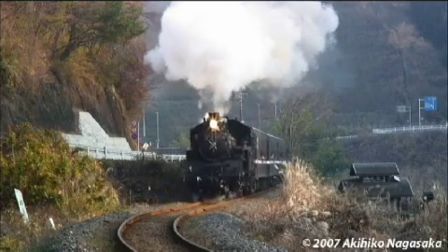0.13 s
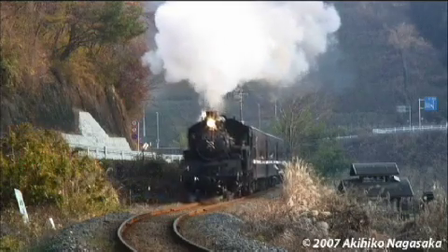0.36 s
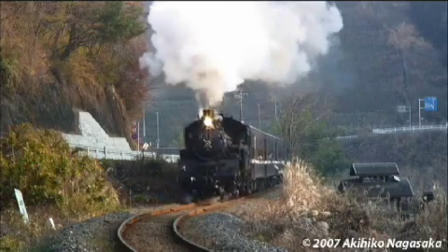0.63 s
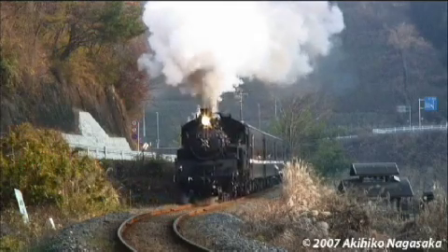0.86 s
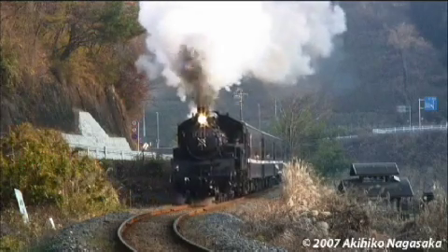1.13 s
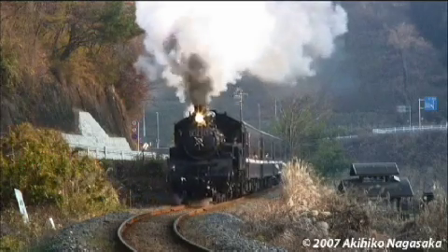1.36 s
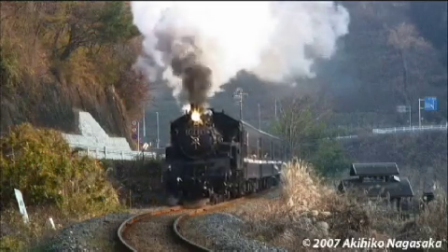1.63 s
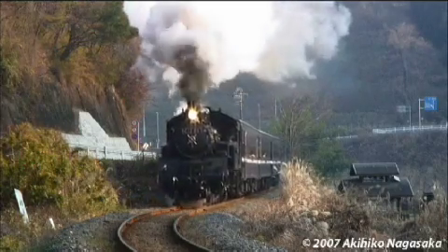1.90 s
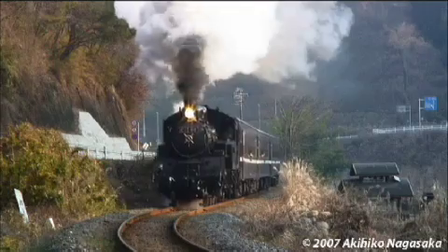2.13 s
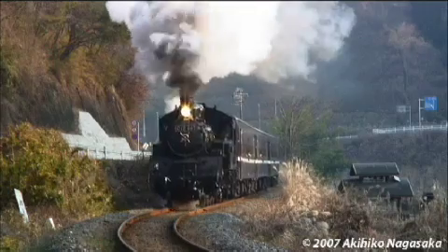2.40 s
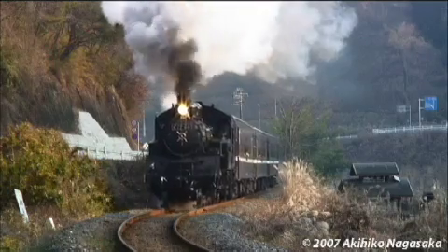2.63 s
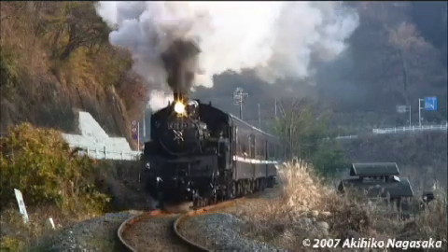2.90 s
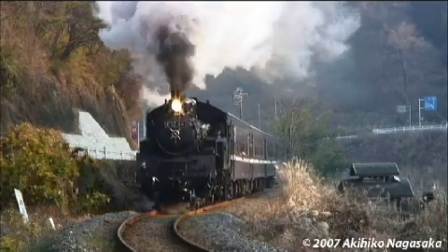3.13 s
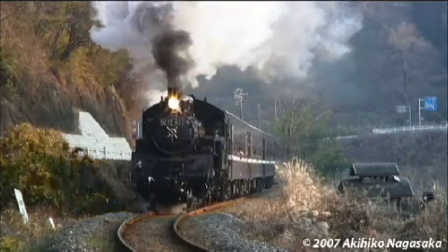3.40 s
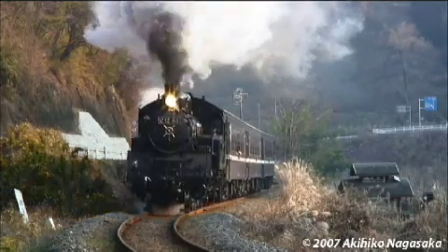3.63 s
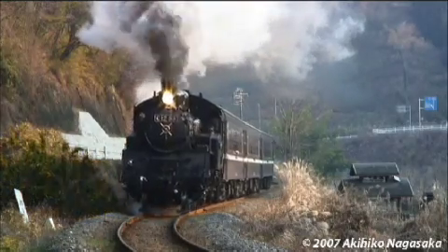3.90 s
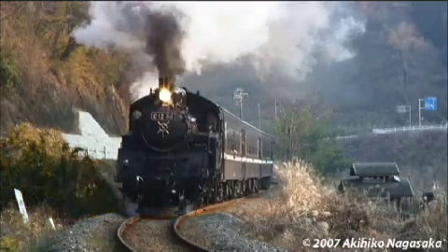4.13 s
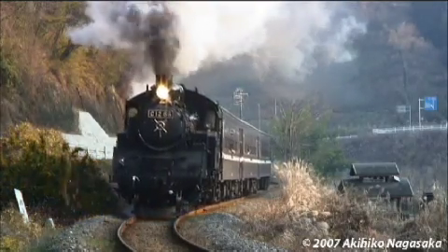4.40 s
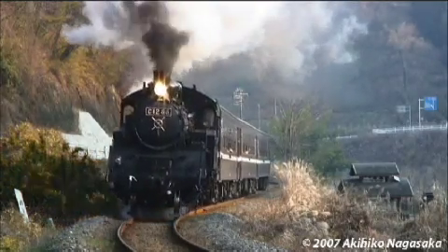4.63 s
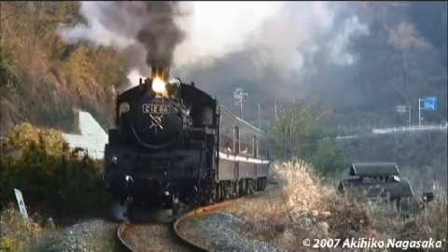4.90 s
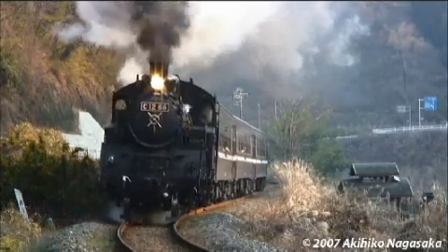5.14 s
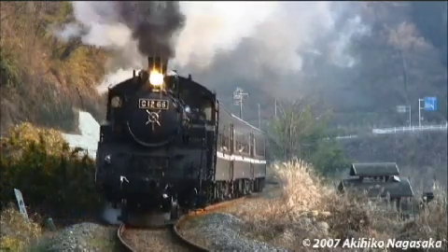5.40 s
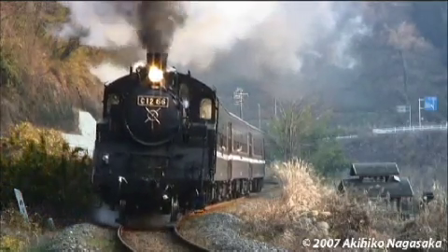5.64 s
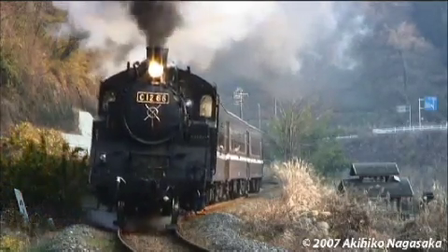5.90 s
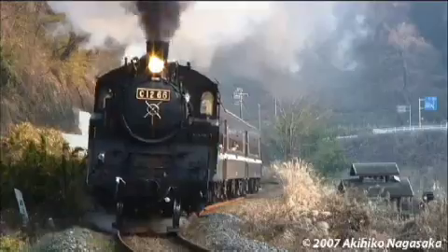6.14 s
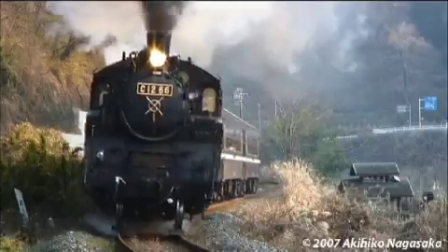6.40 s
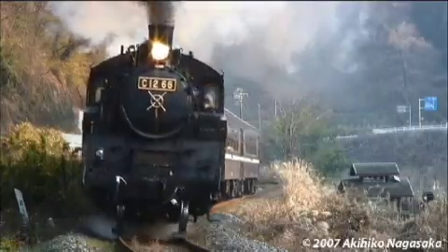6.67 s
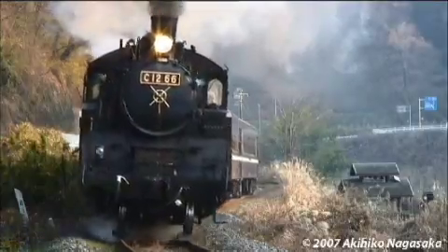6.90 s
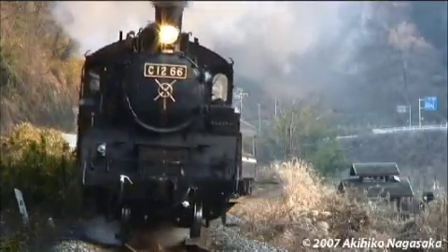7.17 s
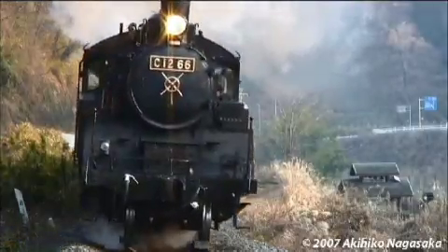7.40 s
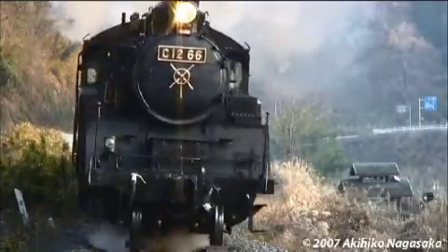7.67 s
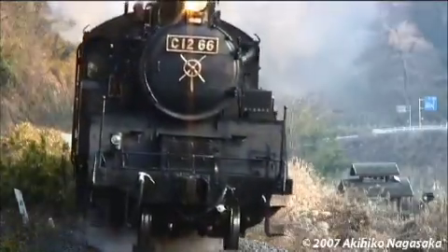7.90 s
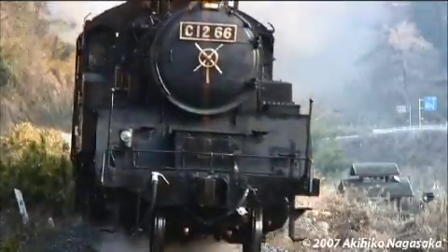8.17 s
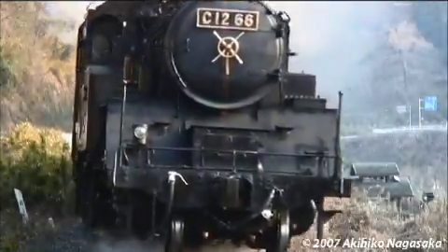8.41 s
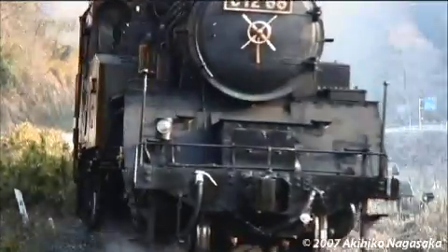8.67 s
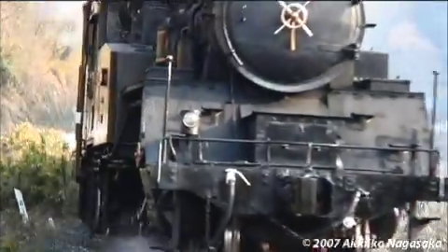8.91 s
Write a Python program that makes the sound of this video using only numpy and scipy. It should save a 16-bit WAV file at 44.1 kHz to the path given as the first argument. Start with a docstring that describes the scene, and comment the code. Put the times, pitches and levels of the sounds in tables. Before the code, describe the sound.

A steam locomotive climbs toward a lineside microphone for about nine seconds. From 0 s, faint hoarse chuffs emerge over a low rolling roar, the first couple of beats weakest, then settling at nearly eight per second. Each puff swells softly, barks in a hollow midrange, rasps and hisses, then drops quickly; rough little pops make every beat uneven. Faint metallic clanks ring near 1.3, 1.4, 1.8 and 2.9 s. From 3 to 5 s the chuffing grows gradually and quickens slightly. A short bark falls in pitch around 5.4 s. After 6 s the blasts become fuller and harder, with stronger wheel rumble and steam leak. A sharp burst and falling yelp stand out near 8.2 s. The last second is loudest and closest, ending mid-beat without fading. Diffuse echoes from the slope blur the gaps; the sound is mono, thin in bass and dull on top.

```python
"""Steam locomotive climbing past

A steam locomotive works uphill towards a lineside microphone; its exhaust beats quicken and grow.
Each beat is a puff of noise: a smokebox boom, a chimney bark, a throat rasp and a hiss at the lip.
Short rough tones are eddy bursts. A side rod clanks, wheels roar, steam leaks, and the cutting
answers with decaying noise. The microphone cuts bass and treble and adds a murmur of air."""
import sys
import numpy as np
from scipy import signal
from scipy.fft import rfft, irfft, next_fast_len
from scipy.io import wavfile
from scipy.ndimage import uniform_filter1d, map_coordinates

SR = 44100
rng = np.random.default_rng(int(sys.argv[2]) if len(sys.argv) > 2 else 0)


def store_wav(level_fs):
    """Save 16-bit WAV to argv[1]."""
    pcm = np.round(np.clip(np.atleast_2d(level_fs), -1, 1) * 32767)
    wavfile.write(sys.argv[1], SR, pcm.T.astype(np.int16))


def level_to_linear(level):
    """Convert decibel levels to linear amplitude factors, elementwise."""
    exponent = np.asarray(level, float) / 20
    return 10 ** exponent


N = 398663
TIME_S = np.arange(N) / SR

# exhaust beats: (time [s], boom [dB], bark [dB], rasp [dB], hiss [dB], nominal valve opening [ms])
EXHAUST_BEATS = [(0.01, -50, -47.5, -50.0, -62.5, 8.7), (0.106, -50.5, -52, -48, -62.5, 32.0),
                 (0.239, -53.5, -44.5, -44.5, -57, 62), (0.369, -52.5, -45, -44.5, -56, 42),
                 (0.505, -45.5, -40, -45, -54, 28.0), (0.63, -45, -43.5, -42, -57, 33),
                 (0.768, -47, -40.5, -44, -56, 47), (0.883, -47.5, -41.5, -42, -53.5, 40.0),
                 (1.013, -48, -42.5, -45.5, -55, 55), (1.142, -47, -45.5, -44.5, -54, 43),
                 (1.285, -40, -42.5, -45, -48.5, 18), (1.399, -45, -42.5, -42, -50.5, 38),
                 (1.532, -50, -41, -45.5, -51.0, 46.0), (1.658, -50.5, -44, -44.5, -53.5, 43),
                 (1.789, -40.5, -44, -43.5, -48.5, 26), (1.907, -45, -44.5, -45.5, -50.5, 41),
                 (2.034, -47, -39.5, -41.0, -51, 43), (2.161, -44, -40.5, -46.0, -52, 36),
                 (2.292, -44, -41, -43, -50.5, 46.0), (2.416, -41.0, -39.5, -41.5, -46.5, 20.0),
                 (2.539, -46.5, -39.5, -41.5, -51.5, 37), (2.664, -47.5, -41.5, -45, -49.5, 26),
                 (2.785, -41.5, -43, -47.5, -50.5, 38), (2.904, -42.5, -42, -41, -47.5, 26),
                 (3.027, -44, -38.5, -43.5, -52, 48.0), (3.151, -45, -42.5, -50, -49.5, 29.0),
                 (3.278, -47, -43, -42.5, -48.5, 40), (3.399, -44, -40, -41.5, -45.5, 17),
                 (3.529, -44, -37, -41, -45.5, 23), (3.643, -42, -36, -40, -49, 31),
                 (3.773, -43, -38.5, -38.5, -46.5, 27), (3.88, -41, -39.5, -40, -48, 38.0),
                 (4.011, -38.5, -38, -45, -47.5, 23), (4.121, -43, -40.5, -45.5, -49.5, 27),
                 (4.249, -49.5, -37, -42, -47.0, 22), (4.364, -37.5, -40, -42, -46.5, 14),
                 (4.486, -45.5, -39, -45.5, -47.5, 26), (4.603, -44, -40, -46.5, -48.5, 25),
                 (4.727, -40, -43.5, -41, -48.5, 34), (4.84, -41, -38, -39.5, -45.5, 33.0),
                 (4.965, -44, -42.5, -44.0, -48, 38), (5.079, -42, -36.5, -39.0, -45.5, 15),
                 (5.201, -43, -38, -39, -47, 41.0), (5.316, -38.0, -39, -39.5, -47, 36),
                 (5.442, -37, -34.5, -41, -44, 19), (5.551, -38, -37.5, -44.5, -46.0, 44.0),
                 (5.674, -39.5, -36.5, -37, -43.5, 41), (5.786, -51, -37.5, -37.5, -45.5, 31),
                 (5.904, -45, -35.5, -37.5, -49, 39), (6.02, -39, -33, -39, -46, 47),
                 (6.142, -40.5, -35.5, -35.5, -48, 53), (6.26, -40, -31, -37, -43.5, 31),
                 (6.374, -39, -36.0, -37.5, -47, 42), (6.491, -37.0, -34.5, -36.5, -44.5, 23.0),
                 (6.609, -37.5, -33, -34.5, -43.5, 57), (6.721, -35.5, -32.5, -34.5, -41.5, 30),
                 (6.842, -42, -32.5, -37.5, -45, 30), (6.954, -40, -36.0, -34.5, -44.0, 29),
                 (7.071, -33.5, -34, -33.5, -42, 38.0), (7.186, -36.0, -29, -33.5, -39.5, 23.0),
                 (7.3, -33.5, -33, -36.0, -43, 26), (7.414, -33, -35, -36, -41.5, 33),
                 (7.536, -35, -36, -33, -40.5, 33), (7.642, -30.5, -29.5, -35.0, -41.5, 31.0),
                 (7.76, -33.5, -29.0, -34.0, -41.5, 40), (7.875, -37.5, -31.5, -33.0, -41.5, 26.0),
                 (7.992, -32, -30.5, -31, -39, 41), (8.099, -32.5, -31.0, -30, -41, 31.0),
                 (8.207, -36.5, -28, -29, -40, 60.0), (8.328, -31.5, -28, -31.5, -42, 36),
                 (8.446, -31, -26.5, -26.5, -40.5, 47), (8.554, -31.5, -25.0, -28, -38.5, 26),
                 (8.67, -28.5, -24.5, -28, -40, 36), (8.778, -31.5, -28, -31.5, -40.5, 39.0),
                 (8.901, -29, -22, -29, -36.0, 28), (9.008, -29, -24.0, -30.5, -36.5, 21)]
# smokebox resonances: (frequency [Hz], bandwidth [Hz], relative level [dB])
SMOKEBOX_MODES = [(169.5, 33.8, -4), (210.2, 54.2, 2.5), (227.2, 77, -5)]
# chimney resonances: (frequency [Hz], bandwidth [Hz], relative level [dB])
CHIMNEY_MODES = [(279.6, 64, -7.5), (345, 44, 2.5), (459, 52, -3.5)]
# chimney-throat resonances: (frequency [Hz], bandwidth [Hz], relative level [dB])
THROAT_MODES = [(551, 55, -4), (737, 226, -8.5), (886, 236, -10), (1404, 32, -18.5), (1600, 100, -21.5)]
# jet noise at the chimney lip: (frequency [Hz], relative density [dB/Hz])
JET_SPECTRUM = [(600, -5), (1200, -1), (2000, -9.5), (3000, -6.5), (4200, -8.5), (5500, -15.5),
                (6500, -22.5), (7700, -44.5)]
# loudest eddy bursts in the chimney: (centre time [s], peak level [dB], pitch [Hz], nominal length [ms])
LOUD_POPS = [(0.125, -40, 461, 11), (0.38, -35.5, 328, 6.1), (0.522, -32, 487.3, 3.9),
             (0.641, -45, 530, 5.7), (1.029, -31.5, 478.5, 8.3), (1.169, -31, 345, 5.4),
             (1.295, -31, 467, 2.2), (1.321, -32.5, 349, 10.4), (1.404, -31.5, 397.6, 5.3),
             (1.661, -37.5, 517, 4.8), (1.912, -33.5, 345, 11), (2.418, -33.5, 465, 11),
             (2.684, -37.5, 431, 11), (3.031, -37, 525, 6), (3.163, -32, 378.6, 8),
             (3.537, -32.5, 479, 5.8), (3.642, -35, 477, 4.5), (3.773, -29.5, 473, 18),
             (3.884, -33.5, 482, 7.7), (4.251, -31, 438, 8.7), (4.372, -29, 397.3, 9.3),
             (4.501, -32.5, 413, 4), (4.606, -35, 421, 17), (4.628, -36.5, 393, 9), (4.73, -35, 345, 16),
             (4.976, -27.5, 375, 4.9), (5.317, -36, 481, 7), (5.563, -23, 384, 2.8),
             (5.681, -24.5, 371.5, 7.8), (5.796, -25, 367.7, 12), (5.908, -30.5, 397, 6),
             (5.937, -28.5, 368.4, 13), (6.268, -24, 371, 3), (6.61, -28, 421, 6.4),
             (6.724, -30.5, 496, 4.2), (7.074, -31, 474, 7.6), (7.182, -26.5, 421, 9.5),
             (7.331, -27, 383, 6.9), (7.426, -30, 376, 2.6), (7.537, -26.5, 438, 16),
             (7.779, -21.5, 441, 6.3), (7.998, -25, 454, 3.6), (8.088, -24, 516, 9), (8.209, -13, 585, 3),
             (8.339, -24.5, 440, 16), (8.449, -20.5, 423, 2.8), (8.558, -18.5, 402, 5.2),
             (8.679, -23.5, 447, 2.3), (8.79, -20, 398, 14), (8.902, -23, 427.4, 14),
             (9.014, -15, 419.5, 3.1)]
# barks of falling pitch: (time [s], main tone peak [dB], start [Hz], end [Hz], t60 [s], rise constant [s])
FALLING_BARKS = [(5.4135, -30, 880, 560, 0.2, .0018), (8.192, -16.5, 960, 520, 0.036, .03)]
# side-rod clanks: (time [s], pitch [Hz], level before decay [dB])
ROD_CLANKS = [(1.28, 1695, -52), (1.403, 1630, -47), (1.786, 1620, -44), (2.899, 1600, -37.5)]
# running noise: (time [s], mean steam leak level [dB], mean wheel roar level [dB])
TRAIN_LEVELS = [(0, -57, -50), (0.5, -59, -52), (2, -58, -49.5), (4, -57.5, -49), (6, -54.5, -46),
                (7.5, -55.5, -41.5), (8.4, -50, -37.5), (9.04, -46.5, -37)]
# wheel roar: (frequency [Hz], relative density [dB/Hz])
ROAR_SPECTRUM = [(53, -63), (90, -33), (178, 4.5), (259, -11), (347, 2), (491, -4), (572, -1),
                 (1200, -14.5), (1600, -23.5), (1890, -26), (2500, -40), (3250, -68.5), (5500, -120)]
# steam leak: (frequency [Hz], relative density [dB/Hz])
LEAK_SPECTRUM = [(590, -15), (1000, -8.5), (1620, -10), (2130, -18), (2910, -16), (5080, -22.5),
                 (6390, -27.5), (7320, -41), (7570, -60), (9840, -121), (16700, -120)]
# echo of the cutting: (frequency [Hz], t60 [s])
CUTTING_DECAY = [(150, 0.15), (1000, 0.16), (6000, 1)]
# colour by ground echo and air when near: (frequency [Hz], gain at nearness 1 against far [dB])
NEAR_COLOUR = [(120, 0.2), (200, -.4), (265, 4.87), (330, 1.39), (480, -.3), (800, 0.9), (1300, -3),
               (1900, -1.5), (3500, 0.1), (6500, 0)]
# approach of the engine: (time [s], nearness [0-1])
APPROACH_PATH = [(0, 0.026), (4.5, 0.12), (7, 0.21), (9.04, 1)]
# air on the capsule: (frequency [Hz], relative density [dB/Hz])
AIR_SPECTRUM = [(10, -4.5), (22, -2.5), (35, -8), (70, -15.5), (150, -19), (400, -42)]
# dull capsule: (frequency [Hz], gain [dB])
CAPSULE_TREBLE = [(6000, 0.0), (6700, -2.5), (6950, -4), (7700, -36.0)]


def exhaust(burst_rows):
    """One steam puff per beat drives four noise voices; eddies roughen bark, rasp and hiss."""
    beat_s, boom_db, bark_db, rasp_db, hiss_db, open_ms = np.transpose(EXHAUST_BEATS)
    hold_s = open_ms / 1000
    fall_s = (12.3 - 0.11 * open_ms) / 1000  # the longer the valve was open, the less steam is left
    lumps = wobble(90)
    fine_lumps_db = 0.75 * lumps + 0.79 * wobble(400)

    boom = filtered(eddies(patchy_db=4.0), resonances(SMOKEBOX_MODES))
    bark = level_to_linear(1.1 * lumps) * filtered(eddies(patchy_db=0.3), resonances(CHIMNEY_MODES))
    rasp = level_to_linear(1.3 * lumps) * filtered(eddies(patchy_db=1.66), resonances(THROAT_MODES))
    hiss = level_to_linear(fine_lumps_db) * coloured(JET_SPECTRUM, patchy_db=2.5)

    # boom, bark and rasp lag the hiss by 2-5 ms
    boom_flow = puffs(beat_s + 0.0022, boom_db, 1.02 * hold_s, 0.98 * fall_s, rise_s=0.011, sag_db_per_s=-61.5)
    bark_flow = puffs(beat_s + 0.0054, bark_db, 0.97 * hold_s, fall_s, rise_s=0.016, sag_db_per_s=-94.5)
    rasp_flow = puffs(beat_s + 0.003, rasp_db, 0.7 * hold_s, 1.2 * fall_s, rise_s=0.013, sag_db_per_s=-73.5)
    hiss_flow = puffs(beat_s, hiss_db, hold_s, 0.92 * fall_s, rise_s=0.018, sag_db_per_s=-63.5)
    return (steady(boom, 0.043) * boom_flow
            + steady(bark, 0.032) * bark_flow
            + steady(rasp, 0.023) * rasp_flow
            + steady(hiss, 0.022) * spits(burst_rows) * hiss_flow)


def puffs(start_s, level_db, open_s, fall_s, rise_s, sag_db_per_s):
    """Steam flow: bell-shaped rise, sagging hold, exponential fall of energy; puffs add in power."""
    power = np.zeros(N + SR)
    t = np.arange(-SR // 10, SR // 4) / SR
    for s, db, hold, fall in zip(start_s, level_db, open_s, fall_s):
        rise = np.exp(-(np.minimum(t, 0) / rise_s) ** 2)
        sag = level_to_linear(sag_db_per_s * np.clip(t, 0, hold))
        decay = np.exp(-np.maximum(t - hold, 0) / (2 * fall))
        power[round(s * SR):][:len(t)] += (level_to_linear(db) * rise * sag * decay) ** 2
    return np.sqrt(power[SR // 10:][:N])


def spits(burst_rows):
    """Each eddy burst also sharpens the jet: a bell of extra gain, a little longer than the burst."""
    gain = np.ones(N + SR)
    t = np.arange(SR // 10) / SR
    centre_s = t.mean()
    for s, _, _, length_ms in burst_rows:
        half_width_ms = 6 + 1.2 * length_ms
        bell = np.exp(-(1000 * (t - centre_s) / half_width_ms) ** 2)
        gain[round(s * SR):][:len(t)] += 0.25 * bell
    return gain[round(centre_s * SR):][:N]


def bursts():
    """Rows of the loud eddy bursts, plus a milder random one early in every beat that has none."""
    beat_s, _, bark_db = np.transpose(EXHAUST_BEATS)[:3]
    delay_s = 0.011
    luck = rng.standard_normal((4, len(beat_s)))
    gap_s = np.abs(beat_s[:, None] + delay_s - np.transpose(LOUD_POPS)[0]).min(axis=1)
    time_s = beat_s + delay_s * np.exp(0.4 * luck[0])
    peak_db = bark_db - 1.5 + 2.3 * luck[1]
    pitch_hz = 440 + 45.1 * luck[2]
    length_ms = 16 * np.exp(0.58 * luck[3])
    mild = np.transpose([time_s, peak_db, pitch_hz, length_ms])
    return np.vstack([LOUD_POPS, mild[gap_s > 0.04]])


def pops(burst_rows):
    """An eddy burst in the chimney is a few rough cycles under a bell."""
    out = np.zeros(N + SR)
    t = np.arange(SR // 10) / SR
    centre_s = t.mean()
    for s, db, hz, length_ms in burst_rows[burst_rows[:, 0] > centre_s]:
        bell = np.exp(-(1180 * (t - centre_s) / max(length_ms, 3)) ** 2)
        out[round((s - centre_s) * SR):][:len(t)] += level_to_linear(db) * bell * rough_tone(np.full(len(t), hz))
    return out[:N]


def yelps():
    """A falling bark is a cluster of four rough tones that slide down together."""
    out = np.zeros(N + SR)
    t = np.arange(SR // 10) / SR
    for s, db, start_hz, end_hz, t60_s, rise_s in FALLING_BARKS:
        pitch_hz = end_hz + (start_hz - end_hz) * np.exp(-t / 0.0229)
        shape = level_to_linear(-60 * t / t60_s) * (1 - np.exp(-t / rise_s)) ** 3
        cluster = sum(gain * rough_tone(ratio * pitch_hz)
                      for ratio, gain in ((1, 1), (0.74, 0.54), (1.2, 0.28), (0.55, 0.37)))
        out[round(s * SR):][:len(t)] += level_to_linear(db) * shape / shape.max() * cluster
    return out[:N]


def rough_tone(pitch_hz):
    """A sine on a pitch curve, its pitch shaken by turbulence."""
    shake = rng.standard_normal(len(pitch_hz))
    shake = uniform_filter1d(uniform_filter1d(shake, size=24), size=24)
    phase = np.cumsum(2 * np.pi * pitch_hz / SR + 0.09 * shake)
    return np.sin(phase + rng.uniform(0, 2 * np.pi))


def rods():
    """A loose side rod rings briefly: decaying sines with a soft onset."""
    out = np.zeros(N)
    for s, hz, db in ROD_CLANKS:
        age_s = np.maximum(TIME_S - s, 0)
        onset = 1 - np.exp(-age_s / 0.004)
        out += level_to_linear(db - 60 * age_s / 0.11) * onset * np.sin(2 * np.pi * hz * age_s)
    return out


def train():
    """Wheels roar on the rails and steam leaks from the glands: coloured noise of wavering level."""
    s, leak_db, roar_db = np.transpose(TRAIN_LEVELS)
    roar_swing_db = 1.5 * wobble(12) + 1.1 * wobble(2.99)
    roar = level_to_linear(np.interp(TIME_S, s, roar_db) + roar_swing_db) * coloured(ROAR_SPECTRUM, patchy_db=2.5)
    flutter_db = 1.2 * wobble(7)
    leak = level_to_linear(np.interp(TIME_S, s, leak_db) + flutter_db) * coloured(LEAK_SPECTRUM, patchy_db=-1.2)
    return roar + leak


def cutting(x):
    """The slope answers late with a noise tail; each frequency dies at its own speed."""
    hz, t, z = signal.stft(rng.standard_normal(SR // 2), SR, nperseg=256)
    decay = level_to_linear(-60 * t / along(CUTTING_DECAY, hz)[:, None])
    tail = signal.istft(z * decay, SR, nperseg=256)[1]
    delayed = np.pad(x, (800, 0))  # samples
    return signal.fftconvolve(delayed, tail / np.linalg.norm(tail))[:N]


def capsule_air():
    """Air murmurs on the capsule: low noise of swinging level."""
    return level_to_linear(-67.5 + 2.5 * wobble(4)) * coloured(AIR_SPECTRUM, patchy_db=-3.0)


def unit(x):
    """Scale to rms 1."""
    return x / np.sqrt(np.mean(x ** 2) + 1e-20)


def steady(x, seconds):
    """Even out random swells slower than the given time; rms 1."""
    power = np.abs(uniform_filter1d(x ** 2, size=max(round(seconds * SR), 9)))
    return unit(x / np.sqrt(power + 0.03 * np.mean(x ** 2)))


def along(points, hz):
    """Read (frequency [Hz], value) points on a log frequency axis."""
    f, v = np.transpose(points)
    return np.interp(np.log(hz + 1), np.log(f + 1), v)


def filtered(x, response):
    """Apply a complex response of frequency."""
    m = next_fast_len(N + SR // 2)
    return irfft(rfft(x, m) * response(np.fft.rfftfreq(m, 1 / SR)), m)[:N]


def resonances(modes):
    """Causal response of parallel resonances with alternating signs."""
    def response(f):
        total = 0
        for k, (centre_hz, width_hz, db) in enumerate(modes):
            damping = 1j * f * width_hz
            total = total + (-1) ** k * level_to_linear(db) * damping / (centre_hz ** 2 - f * f + damping)
        return total
    return response


def wobble(knots_per_s):
    """Smooth random curve through normal-distributed knots."""
    knots = rng.standard_normal(int(N * knots_per_s / SR) + 4)
    return map_coordinates(knots, [TIME_S * knots_per_s])


def eddies(patchy_db):
    """White noise with patches of random gain, some 250 Hz by 40 ms."""
    z = signal.stft(rng.standard_normal(N), nperseg=512)[2]
    field = uniform_filter1d(rng.standard_normal(z.shape), size=3, axis=0)
    field = uniform_filter1d(field, size=7, axis=1)
    return signal.istft(z * level_to_linear(patchy_db * unit(field)), nperseg=512)[1][:N]


def coloured(spectrum, patchy_db):
    """Patchy noise of rms 1 with the given spectrum."""
    return unit(filtered(eddies(patchy_db), lambda hz: level_to_linear(along(spectrum, hz))))


def scene():
    """Engine, its echo and the running train, changing colour on the way in."""
    burst_rows = bursts()
    engine = exhaust(burst_rows) + pops(burst_rows) + yelps() + rods()
    far = engine + level_to_linear(-8) * cutting(engine) + train()
    near = filtered(far, lambda hz: level_to_linear(along(NEAR_COLOUR, hz)))
    nearness = np.interp(TIME_S, *np.transpose(APPROACH_PATH))
    return (far + nearness * (near - far))[None]


def low_pass(x):
    """Removes everything above the highest recorded frequency."""
    return signal.sosfilt(signal.butter(12, 7720, fs=SR, output="sos"), x)


def record(dry):
    """A steep wind filter cuts bass, a dull capsule treble; the air murmur bypasses both."""
    def low_cut(f):
        gentle = (1j * f / (110 + 1j * f)) ** 3
        resonant = -f * f / (150 ** 2 - f * f + 1j * f * 110)
        return gentle * resonant

    def high_cut(f):
        return level_to_linear(along(CAPSULE_TREBLE, f))

    heard = filtered(dry[0], lambda f: low_cut(f) * high_cut(f))
    mix = heard + capsule_air()
    return low_pass(mix[None])


dry = scene()
out = record(dry)
store_wav(out)
```